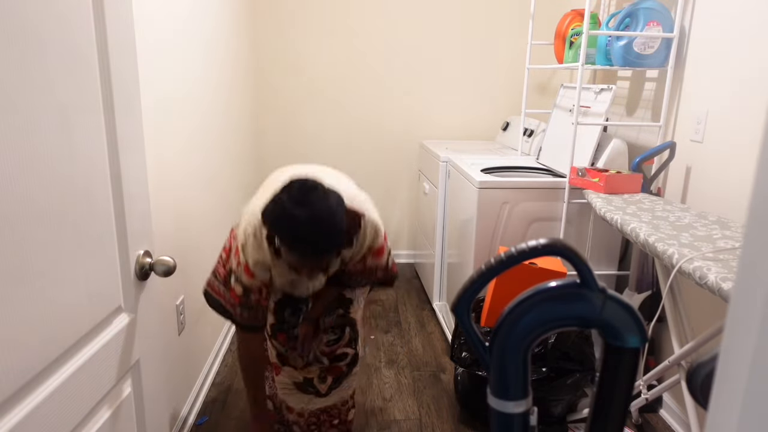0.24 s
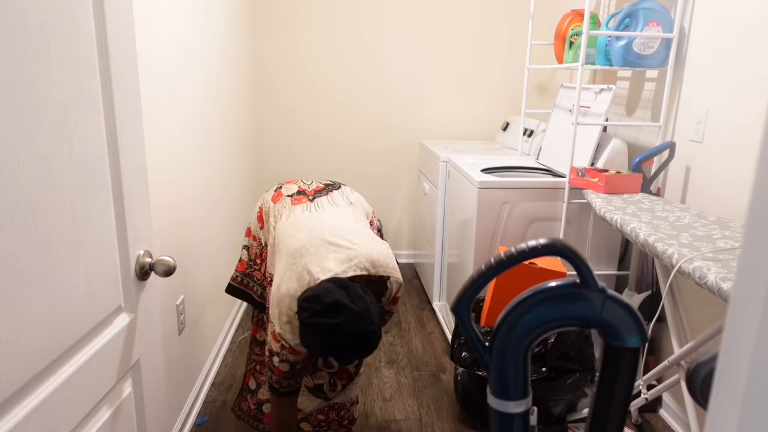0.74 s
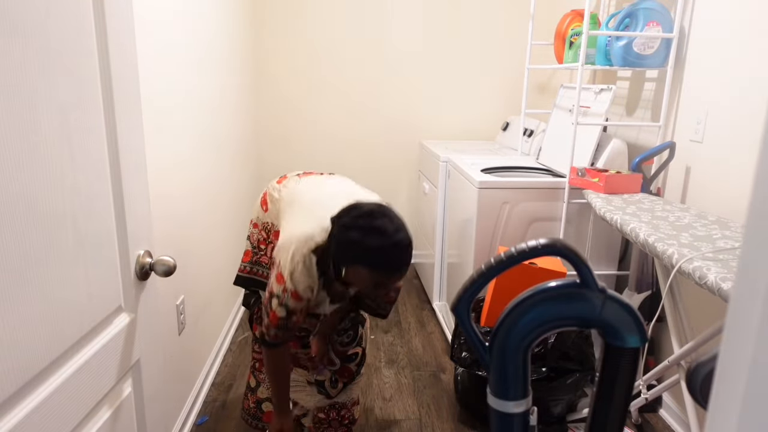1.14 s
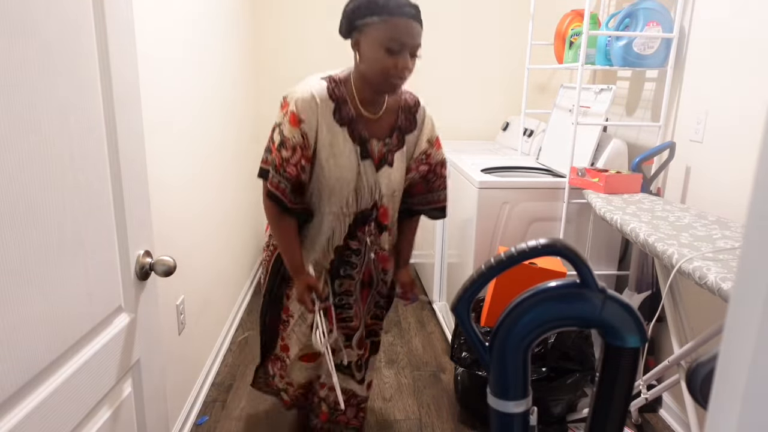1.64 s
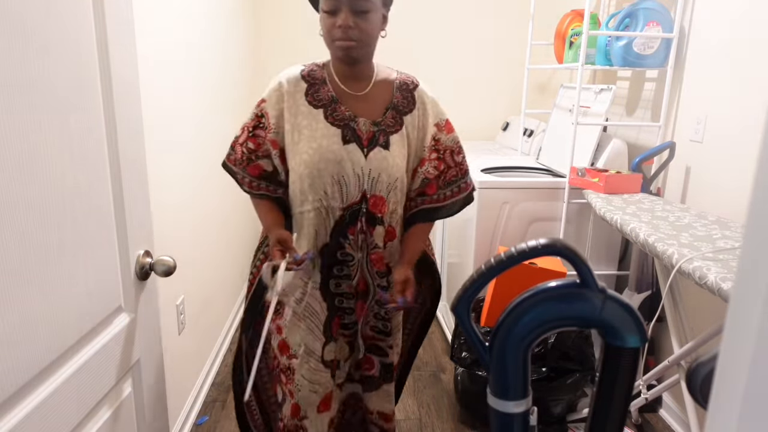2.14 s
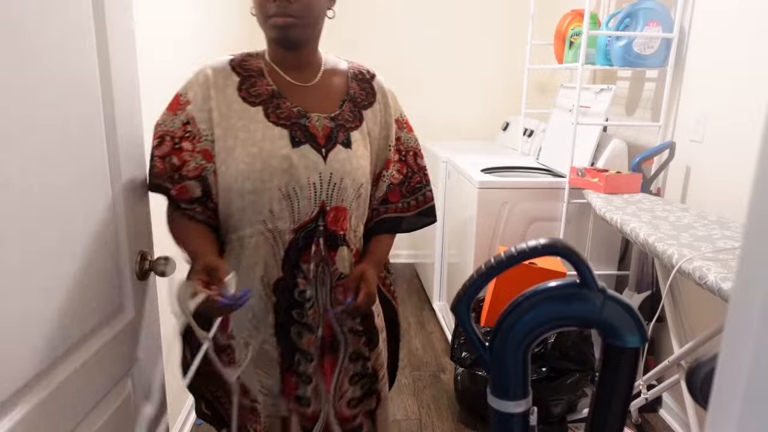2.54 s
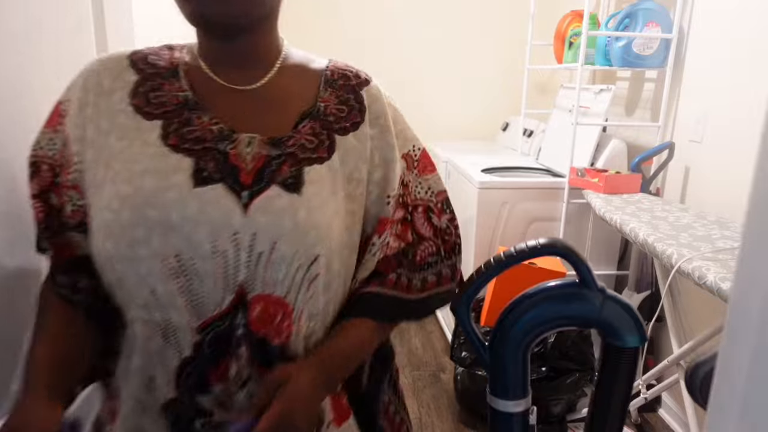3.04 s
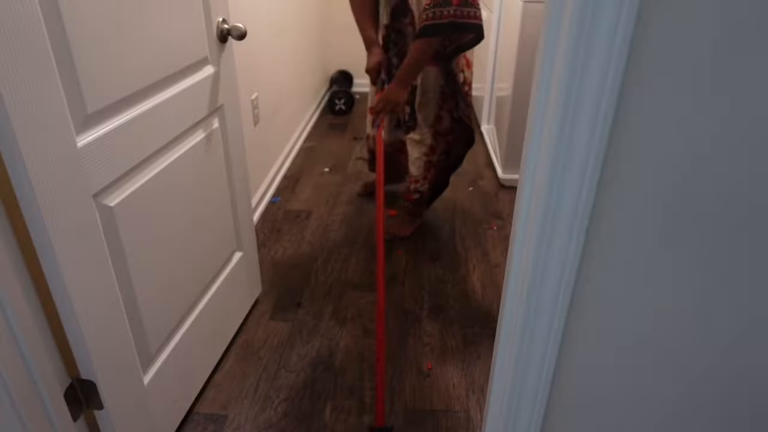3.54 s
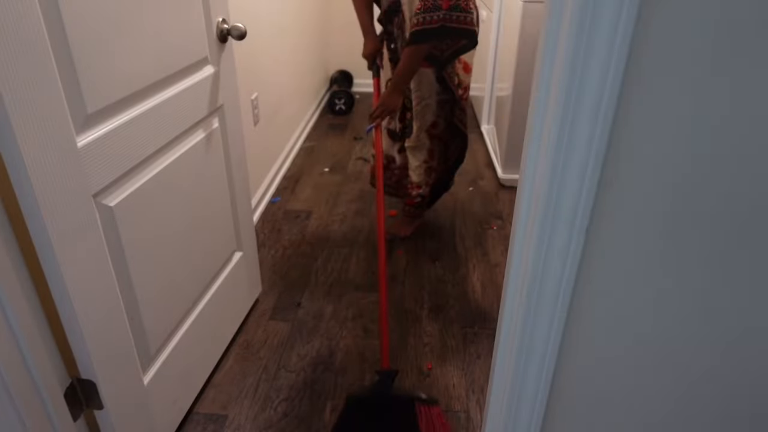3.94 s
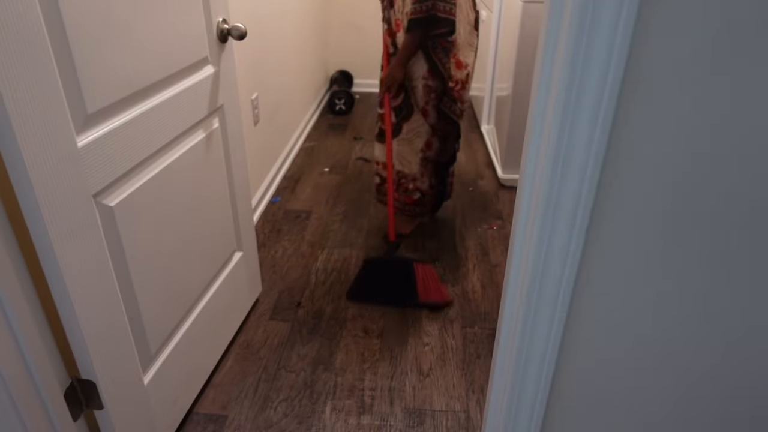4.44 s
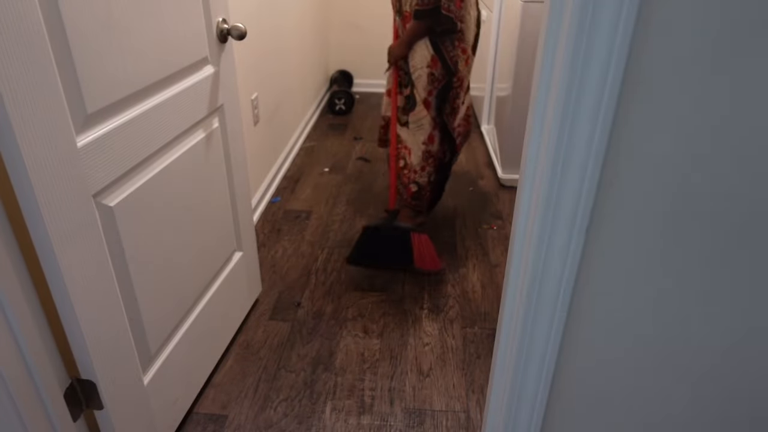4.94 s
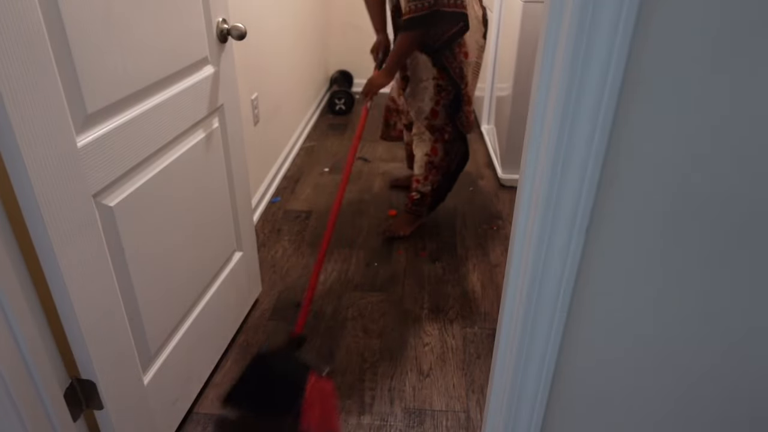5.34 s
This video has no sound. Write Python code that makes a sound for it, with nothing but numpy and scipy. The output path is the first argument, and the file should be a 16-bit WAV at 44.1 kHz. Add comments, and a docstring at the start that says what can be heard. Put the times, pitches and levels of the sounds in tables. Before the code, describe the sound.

In a small echoing laundry room, hangers clatter off the floor and click together over footsteps, followed by quiet, hissing broom strokes.

```python
"""Hangers and broom in a laundry room

Plastic hangers scrape and knock on a hard floor, a hook rings, then they clack as they are carried nearer.
Slippers step, a heel scuffs, a dress rustles; a broom head thuds and its bristles hiss and snap in strokes.
Rubbing is dense random slips; blows are noise bursts and damped modes; the hush is filtered noise.
Close walls echo every source but the hush; the stereo is nearly mono.
"""
import sys
import numpy as np
from scipy import signal
from scipy.fft import rfft, irfft
from scipy.io import wavfile
from scipy.ndimage import map_coordinates

SR = 44100
rng = np.random.default_rng(int(sys.argv[2]) if len(sys.argv) > 2 else 0)


def pcm_store(signal):
    """Save signal as 16-bit PCM."""
    levels = np.round(np.clip(np.atleast_2d(signal), -1, 1) * 32767)
    wavfile.write(sys.argv[1], SR, levels.astype(np.int16).T)


N = 246519
TIME_S = np.arange(N) / SR
HIT_TIME_S = TIME_S[:16384]

# Event levels are inputs to the functions, before the trims and the room mix there.
# Hangers dragged over the floor. Each row: time in seconds, level in dB, treble in dB re level.
DRAG_CURVE = [(0.475, -38, -3), (0.51, -44.5, -4.5), (0.58, -27, 0.5), (0.69, -32, -0.5), (0.729, -25, 0.5),
              (0.8, -38.5, -3.5), (0.93, -45, -4), (1.1, -48, -14)]
# Hook scraping as it is lifted. Each row: time in seconds, level in dB, treble in dB re level.
HOOK_CURVE = [(1.1, -42, -21), (1.154, -36, -19), (1.17, -20.5, -41), (1.218, -37.5, -6), (1.242, -36.5, 5),
              (1.27, -53, 1)]
# Hangers knocking on the floor. Each row: start in seconds, level in dB, treble in dB, contact decay in ms.
KNOCKS = [(0.463, -23.5, -13.5, 11.6), (0.521, -20, -12, 43), (0.541, -22, -3, 6.9),
          (0.57, -10.5, -8.5, 6.6), (0.596, -14.5, -9.5, 8.7), (0.642, -24.5, 0.5, 24),
          (0.656, -23, -2, 17), (0.676, -18, -12, 10), (0.71, -20, -32, 7.6), (0.728, -10.5, -40, 6.6),
          (0.845, -26, -11.5, 16), (1.015, -30, -38, 22)]
# Hangers clacking together. Each row: start in seconds, level in dB, treble in dB, ping pitch in Hz.
CLACKS = [(1.146, -33, -33, 2050), (1.165, -22.5, -38, 2760), (1.237, -25.5, 1, 2900),
          (1.253, -27, -9.5, 2960), (1.333, -31.5, -2.5, 3020), (1.482, -35, -10, 5460),
          (1.633, -31.5, -26, 3360), (1.642, -22.5, -11.5, 3460), (1.89, -38.5, -7, 6000),
          (1.954, -28.5, -0.5, 4650), (2.023, -32, -12, 1940), (2.289, -22, -8.5, 1630),
          (2.339, -30.5, 2, 1660), (2.345, -18, -2.5, 3820), (2.595, -31.5, -2.5, 4300),
          (2.642, -30.5, -9, 3260), (2.646, -25, -10, 6100), (2.677, -24, 1, 5800), (2.694, -25, -10, 2000),
          (2.822, -29.5, -12, 1830), (3.01, -28.5, -14, 2920)]
# Footfalls, and last the broom head thudding on the floor. Each row: start in seconds, slap in dB,
# slap/scuff crossover in Hz, board pitch in Hz, boom in dB, thud in dB, scuff in dB, contact decay in ms.
FLOOR_BLOWS = [(.139, -63, 1480, 239, -64.5, -80, -77, 16), (0.527, -75, 1500, 201, -58, -79, -62, 34),
               (1.873, -40, 1200, 227, -53, -62, -49, 94), (2.275, -30.5, 2400, 239, -69, -85, -55, 15),
               (2.875, -34, 2940, 245.4, -39.5, -76, -48.5, 6.2),
               (3.581, -54.5, 2000, 161, -67.5, -96, -52.5, 17)]
# Short broom strokes. Each row: start in seconds, length in seconds, level in dB, treble in dB re level.
SWEEPS = [(3.412, 0.11, -49.5, -3), (3.544, 0.039, -54, 6.5), (3.749, 0.078, -57.5, 5),
          (5.223, 0.036, -73.5, 15.5), (5.384, 0.25, -62, 9)]
# One long broom pull. Each row: time in seconds, level in dB, treble in dB re level.
PULL_CURVE = [(3.88, -65, 2), (3.884, -72, 12.5), (3.956, -62, 9), (4.204, -54, 1), (4.21, -49.5, 0),
              (4.314, -49, -0.5), (4.71, -49.5, -9.5), (4.92, -65, -31), (4.93, -84, -8)]
# Bristles snapping free. Each row: start in seconds, peak in dB.
SNAPS = [(4.2582, -25), (4.3074, -31), (4.349, -28), (4.3834, -29), (4.4248, -29), (4.6199, -28),
         (4.6604, -33), (4.6862, -34), (4.7466, -37)]
# Broom head knocking on its handle. Each row: start in seconds, level in dB.
HEAD_KNOCKS = [(4.9626, -47), (4.9864, -53)]
# Dress movements, and a heel scuff at 2.156 s. Each row: start in seconds, length in seconds,
# level in dB, treble in dB re level.
RUSTLES_AND_SCUFF = [(0.0, .4, -54, -8), (0.119, 0.018, -55, -25), (1.4, 0.23, -52.5, -4.5),
                     (1.625, 0.07, -53, 8.5), (1.75, 0.22, -50, -13), (2.156, 0.093, -43, -17),
                     (2.448, 0.13, -53, -1.5), (2.745, 0.047, -46, -27), (2.819, 0.044, -45, -7),
                     (2.923, 0.18, -44.5, -4.5)]

# Spectral outline of hangers on the floor. Each row: frequency in Hz, gain in dB.
DRAG_COLOUR = [(59, -89), (100, -40), (205, -26.5), (326, -28), (668, -5.5), (879, -4), (1400, 0),
               (1490, 3.5), (2090, 2.5), (3690, -7.5), (4750, -18.5), (5870, -21.5), (7890, -33.5),
               (11100, -37), (15500, -50)]
# Spectral outline of the hook's scrape. Each row: frequency in Hz, gain in dB.
HOOK_COLOUR = [(120, -67), (200, -58), (365, -64), (653, -13.5), (728, -31), (957, -10), (1430, -5.5),
               (1650, -7.5), (2900, -1), (3680, -18), (5010, -16), (7480, -27), (11000, -31), (15500, -55)]
# Spectral outline of plastic on plastic. Each row: frequency in Hz, gain in dB.
CLACK_COLOUR = [(180, -34), (300, -38), (571, -23), (1440, -9), (1640, -2), (2360, -11.5), (3020, 0.5),
                (4490, -3), (5850, 2.5), (9600, -3), (15500, -22)]
# Spectral outline of a blow on the floor. Each row: frequency in Hz, gain in dB.
FLOOR_BLOW_COLOUR = [(250, -10.5), (400, -4.5), (550, 2), (850, 5), (1300, 6.5), (1750, 8.5), (2700, 5),
                     (4500, 0), (7000, -7), (14000, -46)]
# Spectral outline of the bristles' hiss. Each row: frequency in Hz, gain in dB.
BRISTLE_COLOUR = [(240, -38), (400, -28), (459, -26), (683, -22), (738, -15), (796, -23), (1200, -10.5),
                  (1590, -3.5), (1990, 0.5), (4030, 1), (8150, -4), (14100, -13.5), (15500, -17)]
# Spectral outline of a bristle snap. Each row: frequency in Hz, gain in dB.
SNAP_COLOUR = [(800, -27), (2500, 18), (5000, 20), (8000, 12), (11000, -16), (15500, -10)]
# Spectral outline of the cloth and the heel scuff. Each row: frequency in Hz, gain in dB.
CLOTH_COLOUR = [(120, -29), (200, -17.5), (365, -23), (437, -6), (715, -7), (812, -7.5), (1380, -0.5),
                (2090, 5.5), (9480, -8), (15500, -30)]
# Spectral outline of the hush. Each row: frequency in Hz, gain in dB.
AIR_COLOUR = [(24, -72), (40, -34.5), (253, -14.5), (309, -13.5), (350, -14), (449, -9), (562, -10),
              (778, -7), (949, -6.5), (1410, -5), (1730, -8), (2270, -5.5), (3060, -9), (7710, -12.5),
              (15500, -20.5)]

# Hanger resonances, before the glide. Each row: frequency in Hz, t60 in seconds, relative level in dB.
HANGER_MODES = [(2670, 0.031, -9), (2920, 0.12, 21), (2745, 0.084, 13), (3020, 0.072, -6), (5760, .1, -27)]
# Floorboard resonances. Each row: multiple of board pitch, t60 in seconds, relative level in dB.
BOARD_MODES = [(1, 0.075, 1.5), (1.47, 0.049, 5), (1.66, 0.056, 4.5), (2.1, 0.04, 4), (2.66, 0.16, -6)]
# Low floor thud resonances. Each row: frequency in Hz, t60 in seconds, relative level in dB.
THUD_MODES = [(72, 0.46, -2), (87, 0.23, 0)]
# Broom head resonances. Each row: frequency in Hz, t60 in seconds, relative level in dB.
HEAD_MODES = [(1970, 0.023, -6), (2260, 0.018, 4), (2920, 0.0066, 7.5), (4420, .008, -1)]
# Room decay. Each row: frequency in Hz, t60 in seconds.
ROOM_T60 = [(100, 0.29), (400, 0.43), (2000, 0.44), (5000, 0.49), (10000, 0.3), (16000, 0.51)]
# Stereo width of the echoes. Each row: frequency in Hz, side in dB re mid.
ROOM_WIDTH = [(100, -25), (250, -21), (500, -14.5), (1000, -11.5), (2000, -22), (8000, -22), (14000, -100)]
# Stereo width of the hush. Each row: frequency in Hz, side in dB re mid.
AIR_WIDTH = [(60, -9), (110, -9), (200, -5), (380, -4.5), (700, -5), (1290, -3.5), (2380, -5.5),
             (4400, -23), (8120, -37), (15000, -23)]

TREBLE_HZ, TOP_HZ = 5000, 15850  # body/treble crossover; final lowpass
KNOCK_ROOM_DB = -2.5  # echoes re direct
CLACK_MS, PING_T60_S = 2.12, 0.0055  # contact decay; ping decay
WALL_LAG_S = 0.004  # extra delay of a clack's echoes
FAR_ROOM_DB, NEARING_DB_PER_S = 6, 4.5  # echoes re direct at the first clack; fall as the hangers come nearer
HOOK_GLIDE_PER_S = 0.676  # pitch rise of the ring, as a share
STROKE_EDGE_DB = -8.5  # level at first touch and letting go, re the held level
SWEEP_ATTACK_S, SWEEP_RELEASE_S, SWEEP_DULLING_DB_PER_S = 0.052, 0.062, 14
RUSTLE_ATTACK_S, RUSTLE_RELEASE_S, RUSTLE_DULLING_DB_PER_S = 0.015, 0.013, 7
CATCH_DB, CATCH_GROWTH = -6.5, 0.69  # catching re the pull curve at its loudest; extra dB per dB of the curve
AIR_MID_DB = -62.75  # rms


def hangers():
    """They skid and knock on the floor, a scraping hook excites the hanger's modes, then they clack together."""
    skid = undb(-3.5) * friction([DRAG_CURVE], DRAG_COLOUR, slips_per_s=2000, spread_db=0.5,
                                 judder_db=2.5, judder_rate_hz=170)
    hook = undb(-4.5) * friction([HOOK_CURVE], HOOK_COLOUR, slips_per_s=4000, spread_db=2.5,
                                 judder_db=1.4, judder_rate_hz=140)
    ringing = unit(signal.fftconvolve(hook, ring(HANGER_MODES))[:N])
    ringing = undb(-7.5) * np.std(hook) * ringing
    rubbing = skid + hook + glide(ringing, 1.18, HOOK_GLIDE_PER_S)
    direct, walls = placed(rubbing, room_db=-2)
    for start_s, db, treble_db, ms in KNOCKS:
        knock = undb(db) * tap(DRAG_COLOUR, body_db=-17, treble_db=treble_db - 3, ms=ms)
        add(direct, start_s, knock)
        add(walls, start_s, knock * undb(KNOCK_ROOM_DB))
    for start_s, db, treble_db, ping_hz in CLACKS:
        # each contact has its own short ping
        ping = undb(-14.5) * burst(ring([(ping_hz, PING_T60_S, 0)]), 4.0)
        contact_sound = tap(CLACK_COLOUR, body_db=-14, treble_db=treble_db - 11.5, ms=CLACK_MS)
        clack = undb(db) * (contact_sound + ping)
        room_db = FAR_ROOM_DB - NEARING_DB_PER_S * (start_s - CLACKS[0][0])
        add(direct, start_s, clack)
        add(walls, start_s + WALL_LAG_S, clack * undb(room_db))
    return np.array([direct, walls])


def footsteps_and_broom_thud():
    """Soles, and last the broom head, strike: noise slap and scuff, board modes booming, low modes thudding."""
    track = np.zeros(N)
    for start_s, slap_db, edge_hz, board_hz, boom_db, thud_db, scuff_db, ms in FLOOR_BLOWS:
        slap, scuff = split(colour(contact(ms), FLOOR_BLOW_COLOUR), edge_hz)
        modes = [(ratio * board_hz, t60_s, db) for ratio, t60_s, db in BOARD_MODES]
        boards = split(ring(modes), 132)[1]
        thud = split(ring(THUD_MODES), 220)[0]
        parts = (slap, slap_db), (scuff, scuff_db), (boards, boom_db), (thud, thud_db)
        add(track, start_s, sum(undb(db) * burst(part, 29.0) for part, db in parts))
    return placed(track, room_db=5.5)


def broom():
    """Bristles hiss in dense slips; on the pull some catch and snap free, and the head knocks as it lifts."""
    strokes = [stroke(*row, SWEEP_ATTACK_S, SWEEP_RELEASE_S, SWEEP_DULLING_DB_PER_S) for row in SWEEPS]
    hiss = undb(-2.7) * friction(strokes + [PULL_CURVE], BRISTLE_COLOUR, slips_per_s=14000, spread_db=3.0,
                                 judder_db=0.6, judder_rate_hz=90)
    loudest_db = max(db for _, db, _ in PULL_CURVE)
    catching = [(s, db + CATCH_DB + CATCH_GROWTH * (db - loudest_db), treble_db)
                for s, db, treble_db in PULL_CURVE]
    crackle = friction([catching], BRISTLE_COLOUR, slips_per_s=320, spread_db=2.6,
                       judder_db=2, judder_rate_hz=50)
    snap = colour(signal.unit_impulse(len(HIT_TIME_S)), SNAP_COLOUR)
    snaps, head = np.zeros(N), np.zeros(N)
    for start_s, db in SNAPS:
        add(snaps, start_s, undb(db) * snap / np.abs(snap).max())
    for start_s, db in HEAD_KNOCKS:
        add(head, start_s, undb(db - 4.0) * burst(ring(HEAD_MODES), 9.6))
    return placed(hiss + crackle, room_db=-2) + placed(snaps, room_db=-24) + placed(head, room_db=6)


def dress_and_heel_scuff():
    """Loose cloth slides with each movement, and a heel scuffs once: very dense, even slips."""
    moves = [stroke(*row, RUSTLE_ATTACK_S, RUSTLE_RELEASE_S, RUSTLE_DULLING_DB_PER_S)
             for row in RUSTLES_AND_SCUFF]
    rubbing = friction(moves, CLOTH_COLOUR, slips_per_s=9000, spread_db=0.0, judder_db=2.0, judder_rate_hz=99)
    return placed(undb(-6.1) * rubbing, room_db=-4.5)


def air():
    """The quiet, even hush of the house: steady coloured noise, independent in mid and side."""
    mid, side = (unit(colour(rng.standard_normal(N), AIR_COLOUR)) for _ in range(2))
    side = colour(side, AIR_WIDTH)
    return undb(AIR_MID_DB) * np.array([mid + side, mid - side])


def room_response(build_s):
    """Close walls: dense noise-like echoes that build up at once and decay at a rate set by frequency."""
    t = TIME_S[:32768]
    hz = np.fft.rfftfreq(len(t), 1 / SR)
    noise = rfft(rng.standard_normal((2, len(t))))  # mid, side
    noise[1] *= undb(read(ROOM_WIDTH, hz))
    tail = 0
    for k, (_, t60_s) in enumerate(ROOM_T60):
        # overlapping bands that sum to one
        share = read([(f, float(j == k)) for j, (f, _) in enumerate(ROOM_T60)], hz)
        tail = tail + irfft(noise * share) * np.exp(-np.log(1000) * t / t60_s)
    mid, side = tail * (1 - np.exp(-t / build_s))
    return np.array([mid + side, mid - side]) / np.sqrt(np.sum(mid ** 2))


def placed(x, room_db):
    """Share a sound between the direct path and the walls: rows (direct, walls)."""
    wet = undb(room_db)
    return np.array([x, wet * x]) / np.sqrt(1 + wet ** 2)


def friction(curves, outline, slips_per_s, spread_db, judder_db, judder_rate_hz):
    """Dense random slips of uneven size under a juddering grip; body and treble follow the curves."""
    happens = rng.random(N) < slips_per_s / SR
    sign = rng.choice([-1, 1], N)
    size = undb(spread_db * np.minimum(rng.exponential(size=N), 5))
    grip = undb(judder_db * walk(judder_rate_hz))
    body, treble = map(unit, split(colour(happens * sign * size * grip, outline), TREBLE_HZ))
    track = np.zeros(N)
    for curve in curves:
        s, db, treble_db = np.transpose(curve)
        touching = (TIME_S >= s[0]) & (TIME_S <= s[-1])
        t = TIME_S[touching]
        level = undb(np.interp(t, s, db))
        brightness = undb(np.interp(t, s, treble_db))
        track[touching] += level * (body[touching] + brightness * treble[touching])
    return track


def stroke(start_s, length_s, db, treble_db, attack_s, release_s, dulling_db_per_s):
    """One rubbing movement swells, holds while it dulls, and lets go: rows (s, level dB, treble re level dB)."""
    end_s = start_s + max(length_s, attack_s)
    end_treble_db = treble_db - dulling_db_per_s * length_s
    return [(start_s, db + STROKE_EDGE_DB, treble_db),
            (start_s + attack_s, db, treble_db),
            (end_s, db, end_treble_db),
            (end_s + release_s, db + STROKE_EDGE_DB, end_treble_db)]


def tap(outline, body_db, treble_db, ms):
    """One hard plastic contact, its body and treble each at their own level."""
    body, treble = split(colour(contact(ms), outline), TREBLE_HZ)
    length_ms = 2 + abs(ms) / 2
    return undb(body_db) * burst(body, length_ms) + undb(treble_db) * burst(treble, length_ms)


def contact(ms):
    """Two surfaces meeting: pitchless noise with a flattened spectrum that swells at once and dies away."""
    fade = np.exp(-HIT_TIME_S * 1000 / max(ms, 1))
    swell = 1 - np.exp(-HIT_TIME_S / 0.00015)
    spectrum = rfft(rng.standard_normal(len(HIT_TIME_S)) * fade)
    flat = irfft(spectrum / np.abs(spectrum))
    return flat * np.sqrt(fade) * swell + 1e-18


def ring(modes):
    """Damped modes after a sharp blow; little is radiated far below the first."""
    tone = sum(undb(db - 60 * HIT_TIME_S / t60_s) * np.cos(2 * np.pi * hz * HIT_TIME_S)
               for hz, t60_s, db in modes)
    return split(tone, modes[0][0] / 3)[1]


def glide(x, around_s, share_per_s):
    """Bend pitch steadily upward within half a second either side of the moment it is unchanged."""
    shift_s = share_per_s * np.clip(TIME_S - around_s, -.5, .5) ** 2 / 2
    return map_coordinates(x, [(TIME_S + shift_s) * SR], order=3)


def walk(rate_hz):
    """Random values joined by straight lines."""
    return np.interp(TIME_S * rate_hz, np.arange(4096), rng.standard_normal(4096))


def colour(x, points):
    """Causal minimum-phase filter with a (Hz, dB) outline, falling away below its first point."""
    size = 4096
    hz = np.maximum(np.fft.rfftfreq(size, 1 / SR), 1)
    gain = undb(read(points, hz)) * np.minimum(hz / points[0][0], 1) ** 2
    cepstrum = irfft(np.log(gain))
    # fold the cepstrum onto positive time
    cepstrum[1:size // 2] *= 2
    cepstrum[size // 2 + 1:] = 0
    return signal.fftconvolve(x, irfft(np.exp(rfft(cepstrum))))[:len(x)]


def split(x, hz):
    """The parts below and above a frequency, in phase with each other."""
    parts = []
    for kind in ("low", "high"):
        once = signal.butter(2, hz, kind, fs=SR, output="sos")
        parts.append(signal.sosfilt(np.tile(once, (2, 1)), x))
    return parts


def read(points, hz):
    """Interpolate (Hz, value) rows on a log-frequency axis."""
    f, value = np.transpose(points)
    return np.interp(np.log(np.maximum(hz, 1)), np.log(f), value)


def undb(db):
    """Decibels to gain."""
    return 10 ** (np.asarray(db) / 20)


def unit(x):
    """Scale to rms 1."""
    return x / np.sqrt(np.mean(x ** 2))


def burst(x, ms):
    """Scale to the energy that rms 1 has over so many milliseconds."""
    return x * np.sqrt(ms * SR / 1000 / np.sum(x ** 2))


def add(track, start_s, x):
    """Mix a sound into a track at a time."""
    start = max(int(start_s * SR), 0)
    track[start:start + len(x)] += x[:N - start]


def scene():
    """All sources share one room: direct sound plus echoes, over the hush."""
    direct, walls = hangers() + footsteps_and_broom_thud() + broom() + dress_and_heel_scuff()
    echoes = signal.fftconvolve(walls[None], room_response(build_s=0.00053), axes=1)[:, :N]
    return direct + echoes + air()


def record(dry):
    """The right channel is a touch louder; the top is cut steeply."""
    balance = undb(0.14 * np.array([[-1], [1]]))
    lowpass = signal.ellip(10, .1, 80, TOP_HZ, fs=SR, output="sos")
    return signal.sosfilt(lowpass, dry * balance)


dry = scene()
out = record(dry)
pcm_store(out)
```